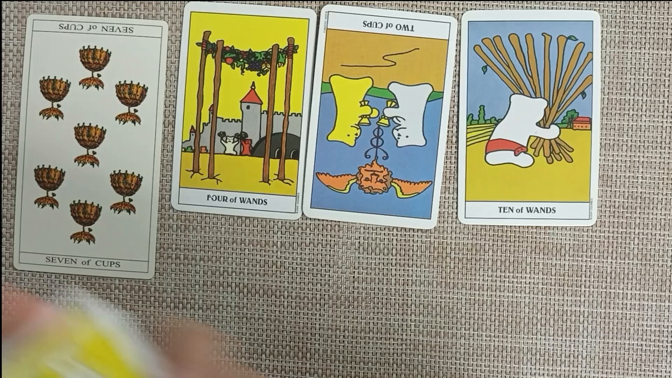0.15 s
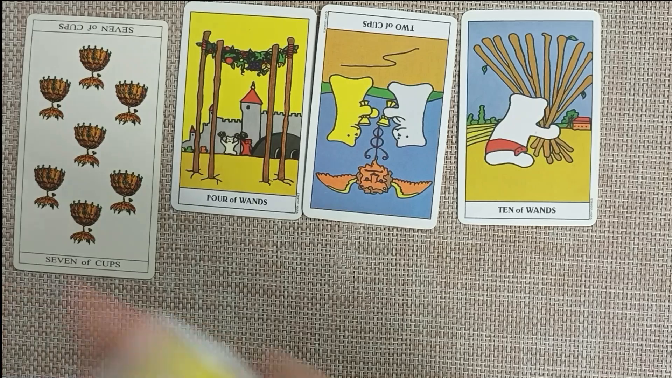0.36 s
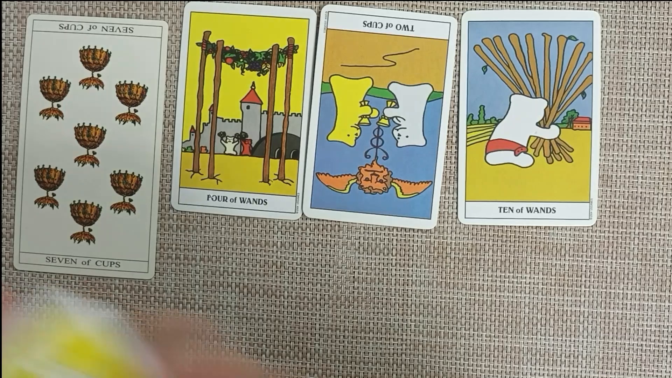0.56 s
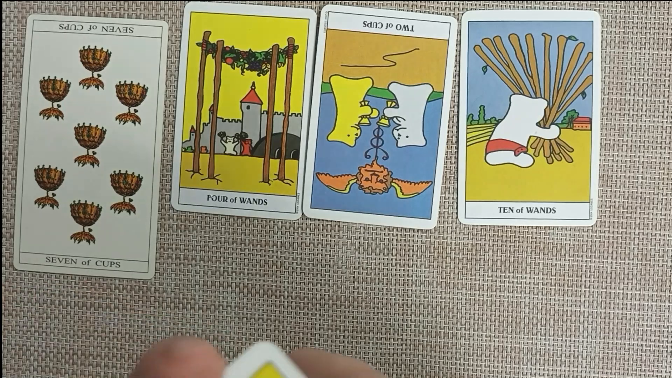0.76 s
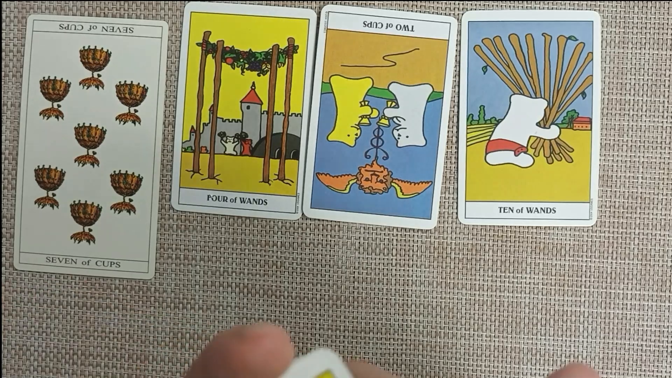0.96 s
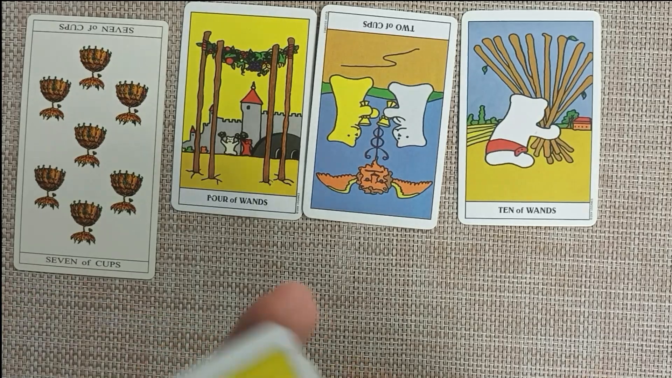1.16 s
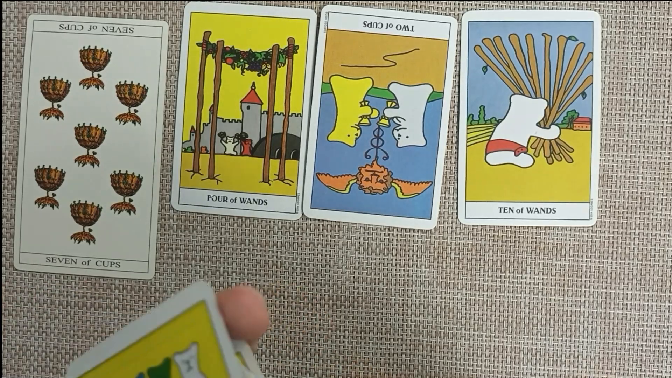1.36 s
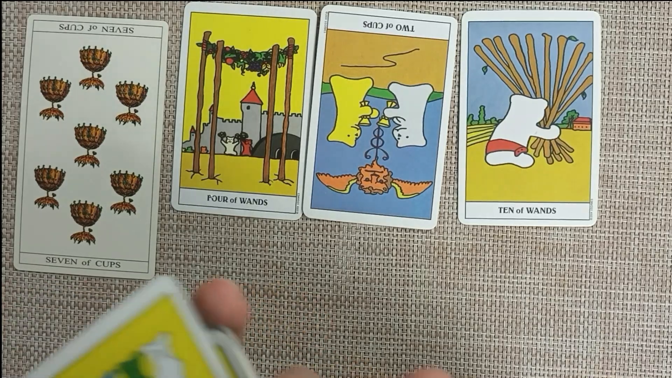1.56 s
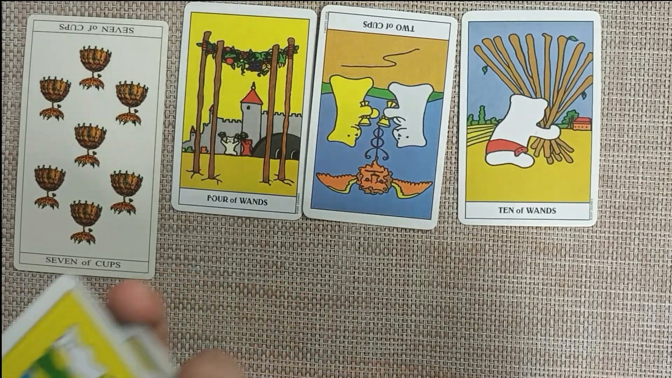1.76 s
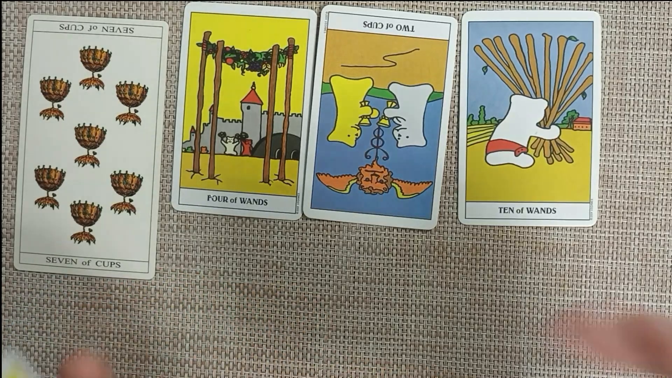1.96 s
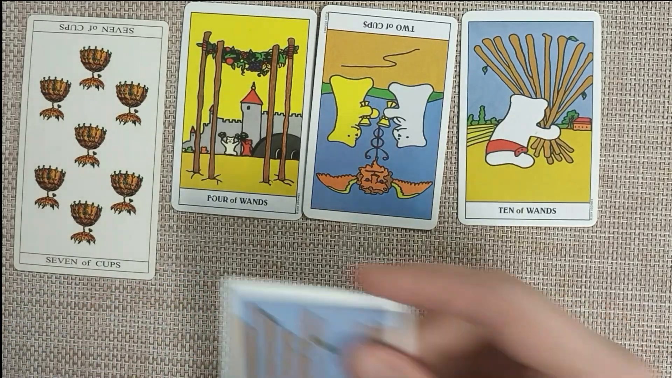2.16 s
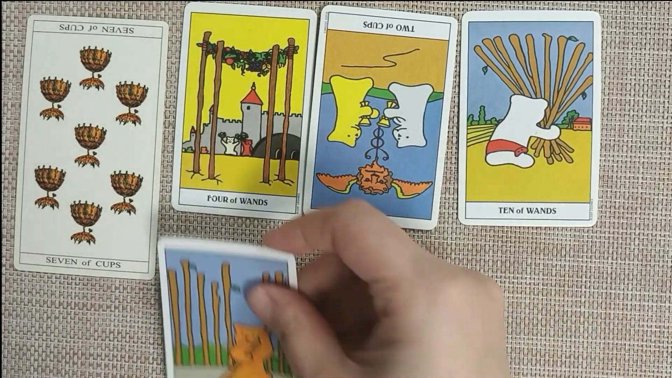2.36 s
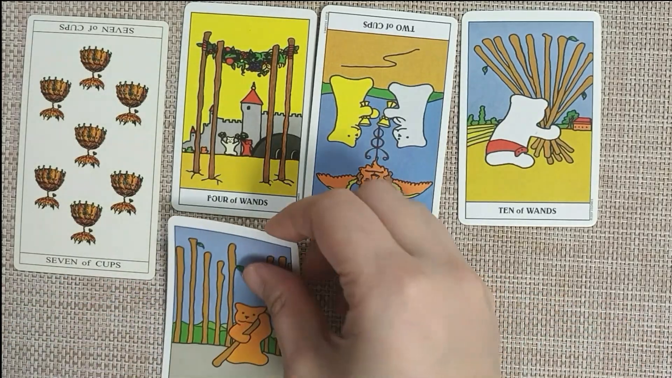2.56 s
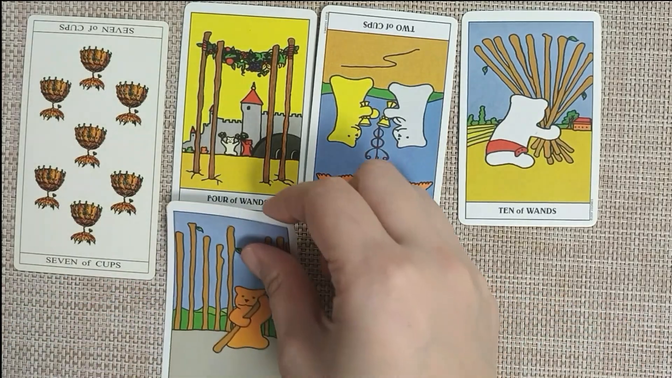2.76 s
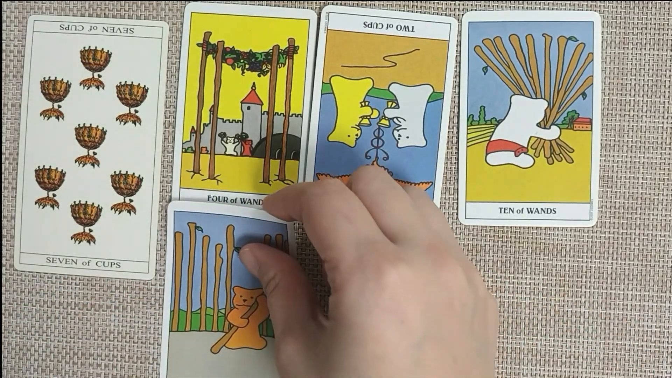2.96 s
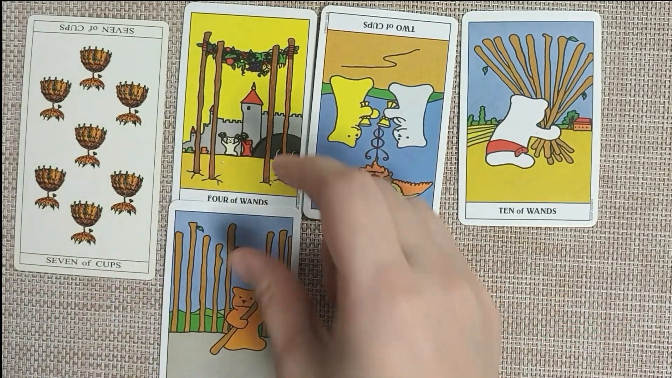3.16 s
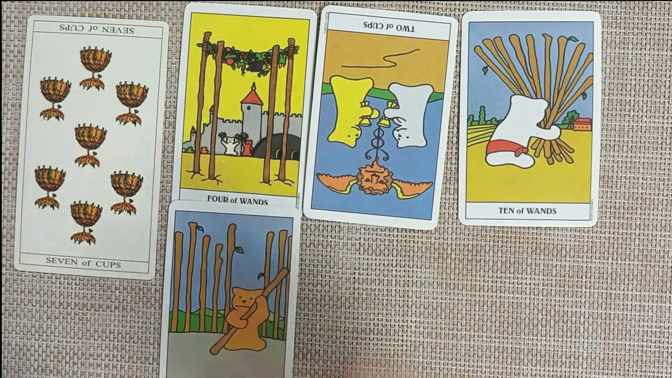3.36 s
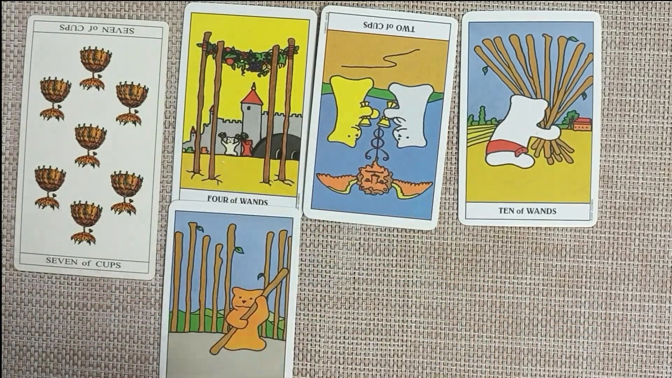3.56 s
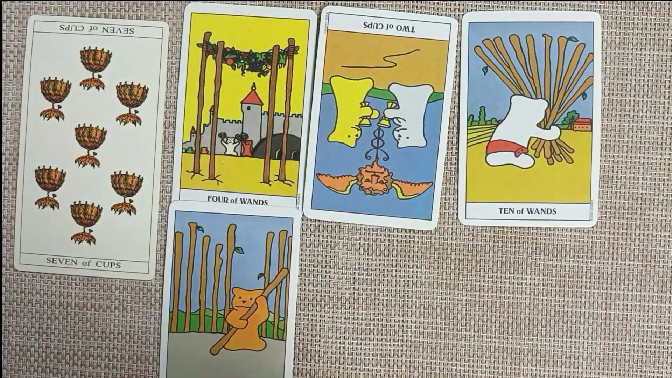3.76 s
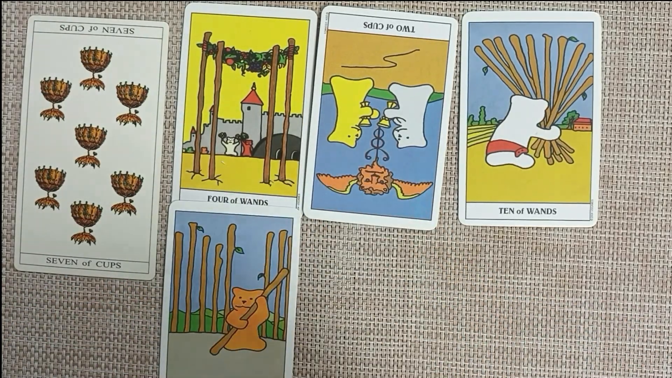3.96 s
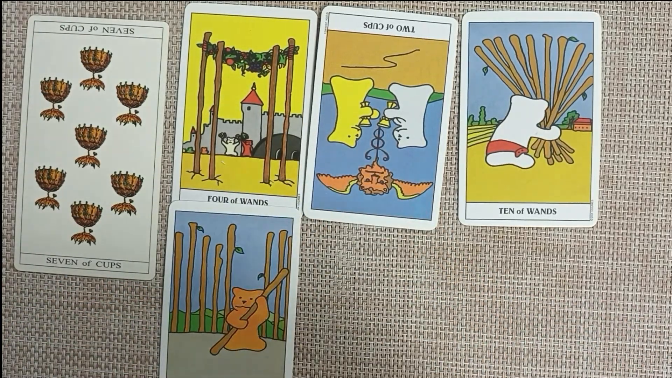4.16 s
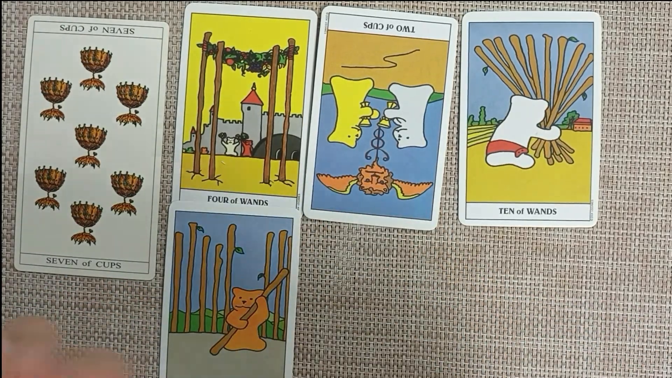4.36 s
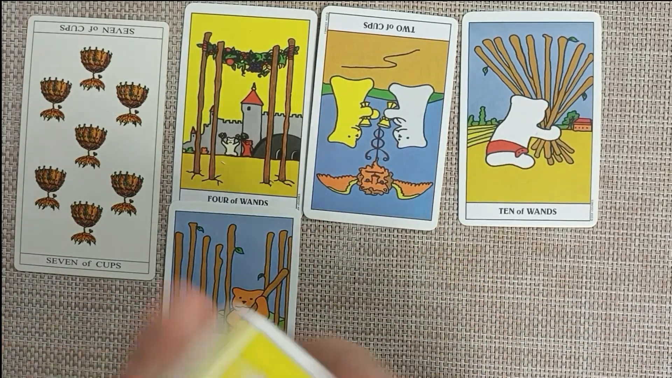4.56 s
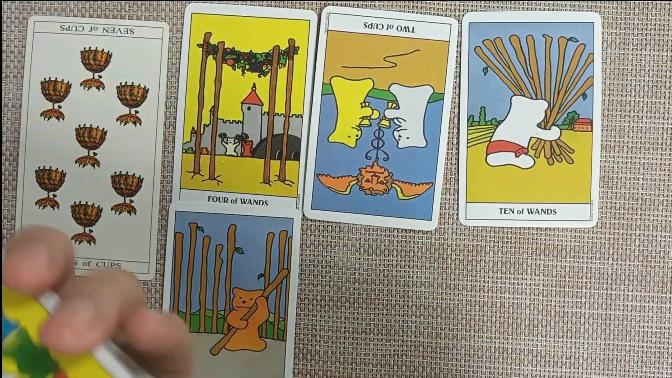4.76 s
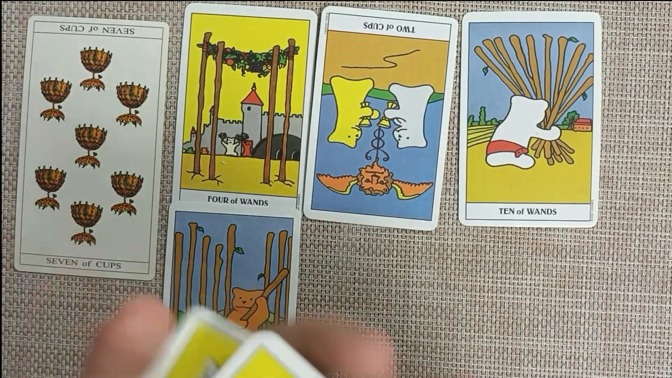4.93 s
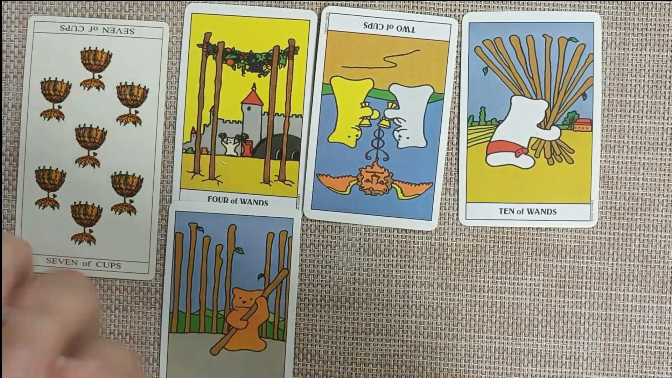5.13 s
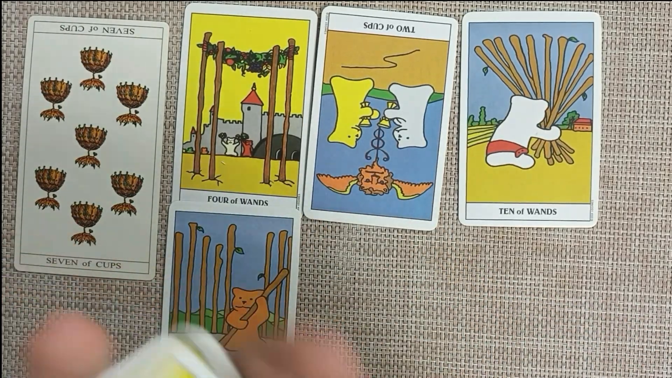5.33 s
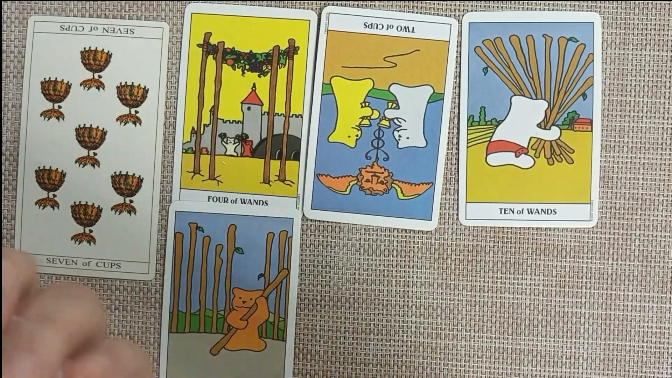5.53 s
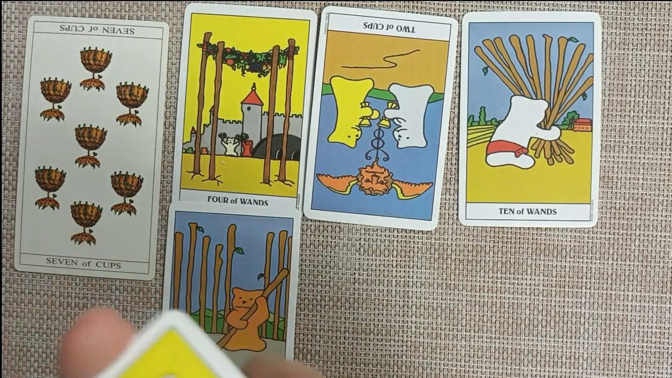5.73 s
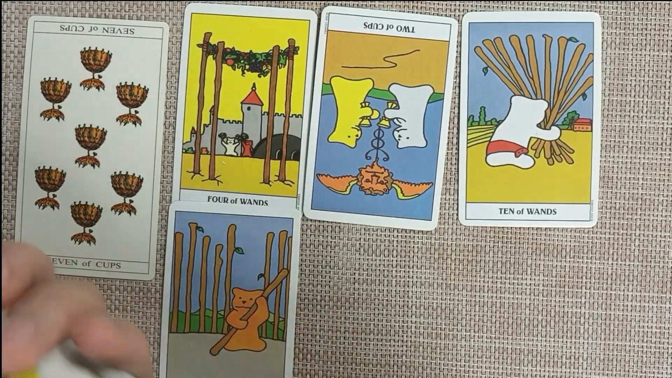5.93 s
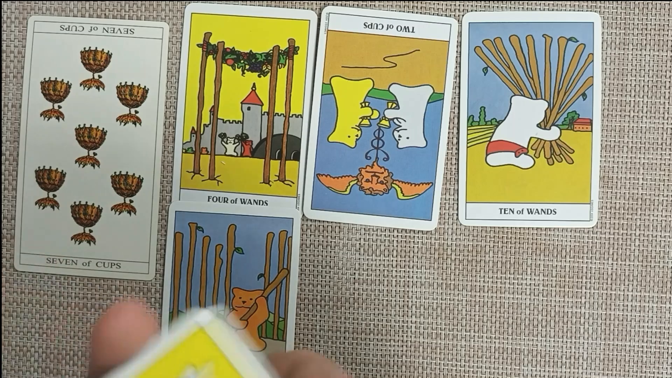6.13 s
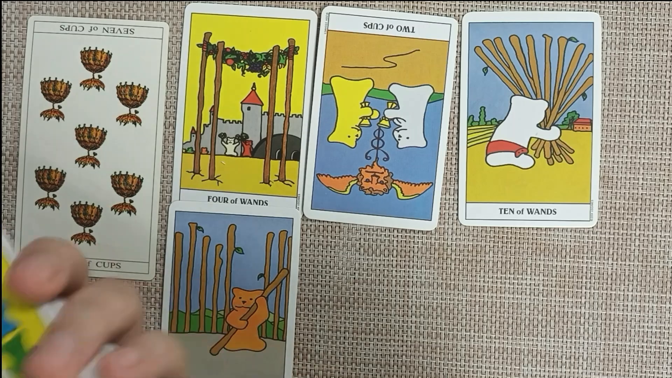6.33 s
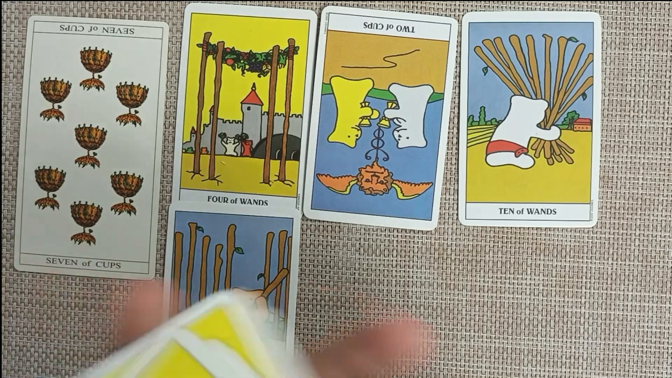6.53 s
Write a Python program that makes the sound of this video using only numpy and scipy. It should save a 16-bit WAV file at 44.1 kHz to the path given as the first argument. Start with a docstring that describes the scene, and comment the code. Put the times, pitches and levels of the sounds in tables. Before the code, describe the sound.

Stiff cards are shuffled overhand close to the microphone, opening with about half a second of crisp slaps and hissing slides. The handling then turns quieter, with scattered ticks and soft rubbing, a longer slide around 1.4 seconds and a couple of clicks near 1.6 and 1.8 seconds. Faint rustling fades until 2.8 seconds, when one card snaps sharply onto a cloth-covered table. A few gentle slides follow between 3.1 and 3.7 seconds. At 4 seconds the shuffling resumes, brisk and louder: packets slap the palm, faces swish and edges click in uneven bursts, two or three each second, with short pauses between them. The last bright cluster comes at about 6.5 seconds. The sound is dry and near, and the room is quiet, with a faint hiss and a distant low rumble throughout.

```python
"""Slaps, hissing slides and ticks of stiff cards shuffled overhand; one card snaps onto a cloth-covered table.
Packets strike the palm, faces rub and edges catch, driving the modes of the deck.
Distant rumble fills the quiet room. A two-port microphone sits close by;
the recorder ducks after loud slaps and clips the sharpest ones."""
import sys
import numpy as np
from scipy import signal
from scipy.fft import rfft, irfft
from scipy.io import wavfile
from scipy.ndimage import uniform_filter1d

SR = 44100
rng = np.random.default_rng(int(sys.argv[2]) if len(sys.argv) > 2 else 0)


def dump(signal):
    """Clip the signal to [-1, 1] and save it as 16-bit WAV at the path in sys.argv[1]."""
    limited = np.clip(np.atleast_2d(signal).T, -1, 1)
    pcm = np.round(limited * 32767).astype(np.int16)
    wavfile.write(sys.argv[1], SR, pcm)


N = 295029

# Room hiss spectrum: freq_hz, relative_db
AIR_SPECTRUM = [(150, -7), (250, -5.5), (557, -14), (845, -7), (1040, -12.5), (1330, -7.5), (3580, -21.5),
                (5350, -31.5), (8400, -43), (10700, -27), (16000, -29)]
# Room tone likeness between ports: freq_hz, coherence
ROOM_COHERENCE = [(60, 0.94), (300, 0.71), (900, 0.4), (3000, 0.034)]
# Distant rumble spectrum: freq_hz, relative_db
RUMBLE_SPECTRUM = [(29, -21), (50, -3), (85, 0.5), (124, -6), (160, 1.5), (184, -6), (247, -7.5),
                   (306, -16.5), (500, -23.5), (650, -27.5), (1100, -120)]
# Background swell: time_s, rumble_db, low_tone_db
RUMBLE_LEVELS = [(0.0, -69, -54), (0.2, -43, -52), (0.59, -57, -64), (0.69, -48, -57), (1.19, -45.5, -56),
                 (1.68, -43, -42), (1.96, -41, -49), (2.48, -43.5, -49.5), (2.603, -48, -51),
                 (2.81, -46, -47), (3.74, -50.5, -61), (4.021, -49, -53), (4.57, -43, -55),
                 (4.836, -45.5, -55), (5.349, -51.5, -42.5), (5.5, -43.5, -45.5), (6.2, -44, -41),
                 (6.69, -48, -47)]
# Wall reflection decay: freq_hz, t60_s
WALL_DECAY = [(300, 0.18), (2000, 0.23), (8000, 0.2), (15000, 0.13)]
# Response of the left port, facing away from the hands: freq_hz, gain_db
LEFT_PORT_EQ = [(2000, 0.5), (8000, 2), (14000, -4)]
# Held deck: freq_hz, width_hz, relative_db
DECK_MODES = [(1735, 59, -6), (2170, 190, 4), (3070, 1270, 13), (3760, 1500, 9.5), (5330, 2340, 20)]
# Deck against palm or table: freq_hz, width_hz, relative_db
THUMP_MODES = [(264, 450, 0), (427, 640, -3), (700, 240, -3), (940, 130, -6), (1490, 250, -4)]
# Rubbing spectrum, with the port's peak: freq_hz, relative_db
HISS_SPECTRUM = [(2350, -47.5), (4000, -21.5), (5820, -14), (7940, -11.5), (8770, -9.5), (10300, 1.5),
                 (12200, -7), (15100, -14.5), (16200, -23.5)]
# Fingers on the cards between strokes: time_s, hiss_db, scrape_re_hiss_db
FINGER_RUSTLE = [(0, -58, 7), (.55, -76, 19), (1.199, -60.5, -6), (1.75, -63, -14), (2.3, -62, 4.5),
                 (2.7, -52.5, -5), (3.0, -55.5, -1), (3.8, -53.5, -7.5), (4.15, -49.5, -2),
                 (4.6, -47.5, 1.5), (4.98, -50, -3.5), (5.45, -61, -5), (5.8, -53.5, 2), (6.2, -57, 4),
                 (6.69, -58, 4)]
# Faces sliding: peak_s, hiss_db, swell_s_per_20db, fade_s_per_20db, scrape_re_hiss_db, left_re_right_db
SLIDE_STROKES = [(0.01, -22, 0.082, 0.07, -10.5, -3), (0.128, -18.5, 0.071, 0.082, -41, -4.5),
                 (0.179, -20.5, 0.05, 0.044, -7, -1), (0.295, -27, 0.011, 0.027, -7, 3),
                 (0.374, -23, 0.029, 0.082, -12, -3), (0.681, -41, 0.074, 0.036, -2, -5),
                 (0.765, -36, .005, 0.034, -13, 4), (0.85, -38, 0.11, 0.44, -18, -2),
                 (1.0, -45, 0.49, 0.13, -3.5, -3), (1.285, -38, 0.047, 0.52, -3, -1),
                 (1.375, -29.5, 0.11, 0.11, -10.5, -1), (1.4, -28.5, 0.064, 0.074, -8, -7),
                 (1.428, -30.5, .08, 0.03, -9, -7), (1.5, -47, 0.05, 0.061, 6, 0),
                 (1.53, -41, 0.12, 0.014, 6, -3.5), (1.6, -32, 0.17, 0.015, -11, -5.5),
                 (1.63, -40, .005, 0.11, -13, 0), (1.772, -33, 0.003, 0.047, -12, -4),
                 (1.909, -37.5, 0.23, 0.64, -2.5, 0), (2.078, -45, .005, 0.33, 1, -2),
                 (2.19, -45, 0.14, 0.054, 5, 2), (2.814, -34.5, 0.0054, 0.14, -27, 1),
                 (3.131, -35, 0.067, 0.054, -5, -3), (3.351, -34, 0.097, 0.26, -10, 1),
                 (3.52, -48, 0.2, 0.059, -9, -1), (3.648, -32.5, 0.054, 0.1, -13, -2.5),
                 (3.975, -22, 0.12, 0.064, -20, -2.5), (4.001, -14, 0.014, 0.052, -16.5, 0),
                 (4.228, -29.5, 0.0069, 0.031, -16, -1), (4.262, -22, 0.019, 0.059, -3, -8),
                 (4.35, -25.5, 0.079, 0.12, -15, -2.5), (4.395, -26.5, 0.018, 0.023, -6, -3),
                 (4.411, -2.5, 0.025, 0.039, -36, -2), (4.655, -28.5, 0.0052, 0.16, 0, -6),
                 (4.764, -15.5, 0.019, 0.036, -12.5, -2), (4.847, -15.5, 0.11, 0.034, -21, -1),
                 (5.048, -38, 0.0047, 0.057, 0, 0), (5.103, -22.5, 0.011, 0.069, -10.5, 5),
                 (5.17, -29, .06, 0.043, -12, 0), (5.215, -25, 0.069, .05, -40, 1),
                 (5.239, -19, 0.065, 0.055, -36, -6.5), (5.36, -38.5, 0.28, 0.16, -4.5, 2),
                 (5.477, -14, 0.0048, 0.058, -8, -2.5), (5.55, -24.5, 0.049, 0.06, -11, -5),
                 (5.587, -11.5, 0.03, 0.05, -24.5, -2.5), (5.613, -8, 0.013, 0.043, -23, 4),
                 (5.624, -1, 0.02, 0.014, -32, -9), (5.659, -32, 0.034, 0.12, -14, 2),
                 (5.862, -15, 0.0098, 0.044, -9, 2), (5.885, -27.5, 0.025, 0.027, -2.5, 5),
                 (5.93, -29, 0.018, 0.15, -14, -8), (5.98, -30.5, 0.061, 0.027, -5.5, -9),
                 (6.02, -19.5, 0.15, 0.058, -23, 2), (6.043, -19.5, 0.092, 0.021, -37, -5),
                 (6.165, -43, 0.018, 0.044, -7, -2), (6.295, -24.5, 0.0079, 0.085, -5.5, -6),
                 (6.42, -31, 0.15, 0.18, -13.5, -3), (6.455, -22, 0.082, 0.06, -24, 2),
                 (6.483, -11, 0.0065, 0.064, -19.5, 2), (6.501, -10.5, 0.078, 0.0089, -32, -9),
                 (6.56, -42.5, 0.051, 0.21, -3, 1)]
# Faster rubbing scrapes higher: hiss_db, pitch_hz
SCRAPE_PITCH_CURVE = [(-52.5, 1800), (-41, 3400), (-38, 4400), (-16.5, 4300), (-9, 7400)]
# Dealt card: freq_hz, level_db
FLICK_MODES = [(430, -11), (950, -13), (3100, -25), (4030, -3), (5000, -12), (6050, -3), (7300, 0)]
# Impact spectrum: freq_hz, relative_db
SNAP_SPECTRUM = [(2350, -30.5), (4000, -18), (4660, -13.5), (6850, -5.5), (7440, -5), (8030, -7.5),
                 (10200, 8), (15200, -12), (16200, -6.5)]
# Edges and packets striking: time_s, snap_db, t60_s, left_re_right_db, ring_re_snap_db, ring_hz,
# thump_re_snap_db, knock_re_snap_db, knock_hz
IMPACTS = [(0.0014, -8, 0.024, -2.5, -0.5, 3770, -10, -4.5, 1327),
           (0.161, -20.5, 0.038, -3, -6, 2000, -2.5, -1, 910),
           (0.1653, -18, 0.026, -5, 0, 2540, -3, 2, 300),
           (0.181, -10.5, 0.04, -3, -37.0, 4680.0, -33, -22, 410),
           (0.2904, -15.5, 0.026, -4, -6.5, 2330, -11, -18, 300),
           (0.297, -29.5, 0.022, -7, -17.0, 2230.0, -7, 14, 687),
           (0.3316, -2, 0.0059, -6, -0.5, 3270, -40, -11, 1250),
           (0.357, -28, 0.03, -11, -1, 1480, -7, -10, 300),
           (0.3619, -18, 0.032, -4.5, 0, 1690, -3.5, 0, 710),
           (0.373, -21, 0.026, -1, -3, 3850, -15.5, -13, 1030),
           (0.439, -40.5, 0.017, -8, -4, 1800, -2, 1, 750),
           (0.677, -28.5, 0.027, -1, -2, 3870, -27, -7, 550),
           (0.689, -35.5, 0.015, -4.5, -3, 3020, -1, -13, 700),
           (0.7593, -25.5, 0.024, -5, -1.5, 1720, -12, -15, 646),
           (0.8346, -31.5, 0.033, 0, -9, 2960, -22, -17, 180),
           (1.12, -37, 0.012, -2, -2, 1440, -21, -19, 200),
           (1.408, -41.5, 0.028, -7, -3.0, 2060, -3.0, 8, 645),
           (1.6161, -12, 0.013, -2, -17, 2840, -13.5, -23, 910),
           (1.6213, -25, 0.079, -3, -28, 1490.0, -8, -4, 317),
           (1.766, -18.5, 0.022, -7, -28, 5100.0, -20.5, -15, 195),
           (2.067, -35, 0.017, -2, 10, 2560, -6, -3, 1060), (2.1684, -37, 0.03, 4, 1.5, 2800, -25, -9, 170),
           (2.19, -37, 0.03, 0, 3.5, 2100, -20, -20, 500), (2.213, -37, 0.03, 2, 0, 2880, -22, -20, 500),
           (2.795, -21, 0.056, -4, 3, 5050, -19, -15, 328),
           (2.801, 2.5, 0.0098, 6, -11, 5660, -32, -13.5, 280),
           (2.8039, -1.5, 0.0082, 2.5, -7, 3200, -31, -20, 282),
           (3.1019, -27, 0.009, 5, -5.5, 2070, -16, -23, 980),
           (3.9898, -6, 0.022, -4, -20, 2110, -46.0, -46, 240),
           (3.9997, -5, 0.018, -10, -13, 2100, -54, -36, 170),
           (4.008, -6, 0.029, -8, -33, 4220.0, -55, -48, 990),
           (4.024, -26, 0.01, -5, -3, 2130, -2, -8, 780), (4.2447, -16, 0.034, -9, 0, 4200, -2.5, -7, 405),
           (4.2557, -15, 0.014, 5, -6, 2960, -30, 1, 950), (4.254, -11.5, 0.018, 2, -6, 1080, -14, -7, 340),
           (4.269, -16, 0.029, -1, -6.5, 3760, -37, -28, 168),
           (4.2915, -25, 0.027, -4, 7.5, 3730, -8, -2, 940),
           (4.2965, -29, 0.032, 3, 10.5, 3130, -25, -20, 930),
           (4.408, -7, 0.019, -4, -39, 4670, -40, -23, 172),
           (4.4134, -7.5, 0.024, -12, -40, 4730, -53.0, -40, 1264),
           (4.431, -6.5, 0.015, 4, -36.0, 3800.0, -44, -50, 170),
           (4.4416, -8.5, 0.024, -1.5, 0, 2250, -22, -11.5, 220),
           (4.6479, -4.5, 0.0076, -2.5, -3, 2010, -22, -11, 470),
           (4.6495, 2, 0.01, -7, -10, 3400, -25, -20, 606),
           (4.654, -19, 0.0067, 1, -10, 3000, -26, -25, 475),
           (4.661, -17, 0.015, -3, -1, 3520, -8, -15, 400),
           (4.6732, -11.5, 0.016, -3, 3, 3900, -6, -2, 167),
           (4.6817, -16, 0.011, -1, 2, 4430, -12, -13, 600),
           (4.7046, -18.5, 0.018, -1, 1.5, 4200, -41.0, -27, 560),
           (4.74, -29, 0.03, 1, -1, 3980, -30, -35, 500),
           (4.759, -10.5, 0.043, 0, -19, 4710.0, -49.0, -33, 1010),
           (4.8318, -3.5, 0.0084, -12.5, -21, 4800.0, -45, -39, 280),
           (4.8431, -1.5, 0.023, -4, -23, 4720.0, -49, -50, 400),
           (4.847, -7.5, 0.015, -14, -24, 5000, -51.0, -50, 1040),
           (5.058, -32, 0.028, 1, 2, 2340, -18, -30, 500),
           (5.0936, -9, 0.017, -5.5, -5, 3260, -12, -29, 270),
           (5.1023, -2, 0.0088, -1.5, -4.5, 3150, -16, -13, 201),
           (5.115, -15.5, 0.033, -7, -23.0, 4300, -42.0, -35, 1130),
           (5.152, -26, 0.039, -2, -2, 3400, -33, -40, 500),
           (5.222, -17, 0.0071, -4, -33, 4500, -40, -40, 660),
           (5.2316, -11, 0.0071, -7, -30.0, 4520.0, -24, -39, 660),
           (5.2401, -7, 0.01, -7, -20, 4570, -41.5, -33, 1290),
           (5.2579, -15, 0.022, 3, -16, 2000, -20.5, -28, 744),
           (5.364, -23, 0.027, -4.5, 2, 2240, -29, -1.5, 180),
           (5.473, -10.5, 0.017, -3, -7, 3600, -28, -24, 860),
           (5.477, -6.5, 0.011, -3, -12, 6300, -16, -16, 835),
           (5.4829, -16.5, 0.015, -3, -12, 1020, -7, -3, 170),
           (5.4916, -8.5, 0.031, 1, -11, 4900, -43.0, -12, 170),
           (5.505, -16.5, 0.053, 2, -23, 3440, -38, -35, 820),
           (5.548, -19, 0.069, 2, -4.5, 3250, -43.0, -32, 690),
           (5.586, -10, 0.039, -2, -34, 4840.0, -50.0, -45, 400),
           (5.6208, -9, 0.033, -11, -45, 3900, -54, -46, 180),
           (5.64, -17.5, 0.015, 0, -9, 2940, -5, -9, 170),
           (5.8523, -9.5, 0.017, -2.5, 0.5, 2135, -3, -13, 310),
           (5.8568, -5.5, 0.013, -4, -4.5, 990, -17, -24, 202),
           (5.873, -11.5, 0.068, -2, -2, 3640, -42, -27, 640),
           (5.979, -33.5, 0.014, 0, -2, 2200, -30, -30, 500),
           (6.044, -15, 0.005, -9, -32.0, 4150, -64, -18, 366),
           (6.0612, -11.5, 0.01, -4, -11.5, 2650, -27, -26, 546),
           (6.291, -6.5, 0.017, -3, 1, 2580, -16, -23, 580),
           (6.303, -17, 0.032, -8, -18, 3780.0, -37, -25, 170),
           (6.313, -21, 0.063, 2, -4, 4040, -42.5, -33, 330),
           (6.445, -16, 0.024, -4, -25.0, 4500.0, -48.5, -20, 170),
           (6.4813, -2.5, 0.014, -6.5, -14, 2030, -19.5, -15, 815),
           (6.4874, -5, 0.0093, -12, -28, 3000.0, -45, -46, 930),
           (6.493, -4, 0.0088, -2, -30, 4500.0, -43.0, -45, 730),
           (6.504, -7.0, 0.0062, -9, -27, 4500.0, -48.0, -50, 1120),
           (6.515, -26.5, 0.019, -5, 0, 2280, -2, -14, 400),
           (6.65, -38.5, 0.013, -2, -6, 2000, -23.0, -50, 170)]

AIR_DB, BASS_LAG_S = -47.5, 0.0006
HUM_HZ, HUM_WIDTH_HZ, HUM_DB = 157.1, 18, -58.5
LOW_TONE_HZ, LOW_TONE_WIDTH_HZ = 42.9, 20
WALLS_DB, LEFT_LAG_SAMPLES = -20.0, 44
HISS_PATCH_DB, SCRAPE_PATCH_DB = 4, 4.5
SCRAPE_SLOPE_RATIO = 0.96  # re hiss, in swell and fade
GRIT_PER_S, GRIT_SPREAD_DB, GRIT_DECAY_S = 250, 7, 0.0036
FLICK_S, FLICK_PAN_DB, FLICK_RISE_S, FLICK_T60_S = 2.8028, 8.5, 0.00078, 0.009
MAX_RISE_S, RISE_PER_T60 = 0.00245, 0.1244
RING_BOOST_DB, LIGHT_TAP_DB, BLUR_DB_PER_DB = 7, -32, 0.48  # hits above a light tap ring less clearly
HAND_T60_S, RING_T60_CYCLES = 0.3, 150  # extra damping of the tones by hand and card
KNOCK_SAG_RATIO, KNOCK_SAG_S = 0.13, 0.025  # pitch sinks as the palm yields
CLICK_RE_SNAP_DB, CLICK_T60_LIMIT_S = 3, 0.025  # longer hits click less
DUCK_THRESHOLD_DB, DUCK_DB_PER_DB, DUCK_SMOOTH_S, HOLD_DECAY_DB_PER_S = -21.5, 0.44, 0.024, 28.0
BAND_LIMIT_HZ = 16000


def gain_of(db):
    return 10 ** (np.asarray(db) / 20)


def unit_rms(x):
    return x / np.sqrt(np.mean(x ** 2) + 1e-20)


def curve_at(points, hz):
    freq_hz, value = np.transpose(points)
    return np.interp(np.log(hz + 1), np.log(freq_hz + 1), value)


def pan_gains(left_re_right_db):
    return gain_of([[left_re_right_db / 2], [-left_re_right_db / 2]])


def port_noise(coherence):
    shared, own = rng.standard_normal((2, N))
    return np.array([coherence * shared + np.sqrt(1 - coherence ** 2) * own, shared])


def spectrum_taps(points):
    """Minimum-phase filter, unit energy."""
    log_gain = np.log(gain_of(curve_at(points, abs(np.fft.fftfreq(4096, 1 / SR)))))
    taps = np.fft.ifft(np.exp(np.conj(signal.hilbert(log_gain)))).real[:1024]
    return taps[None] / np.linalg.norm(taps)


def mode_taps(modes):
    """Sum of damped sines, unit energy."""
    t = np.arange(1500) / SR
    taps = sum(gain_of(db) * np.sqrt(width_hz) * np.exp(-np.pi * width_hz * t)
               * np.sin(2 * np.pi * hz * t) for hz, width_hz, db in modes)
    return taps[None] / np.linalg.norm(taps)


def convolve(x, taps):
    return signal.oaconvolve(x, taps, axes=1)[:, :N]


def swept_resonance(x, hz, width_hz):
    """Band-pass that follows hz; white noise keeps its power."""
    carrier = np.exp(2j * np.pi * np.cumsum(hz) / SR)
    pole = np.exp(-np.pi * width_hz / SR)
    return np.sqrt(2 * (1 - pole * pole)) * (carrier * signal.lfilter([1], [1, -pole], x / carrier)).real


def room_tone():
    """Steady hiss, swelling distant rumble, two fuzzy low tones; bass reaches the right port first."""
    t, hz = np.arange(N) / SR, np.fft.rfftfreq(N, 1 / SR)
    shared, own = rfft(rng.standard_normal((2, N)))
    coherence = curve_at(ROOM_COHERENCE, hz)
    delay = np.exp(-2j * np.pi * hz * BASS_LAG_S)
    noise = np.array([coherence * delay * shared + np.sqrt(1 - coherence ** 2) * own, shared])
    time_s, rumble_db, low_tone_db = np.transpose(RUMBLE_LEVELS)
    hum_band = 1 / (1 + (2 * (hz - HUM_HZ) / HUM_WIDTH_HZ) ** 2)
    low_band = 1 / (1 + (2 * (hz - LOW_TONE_HZ) / LOW_TONE_WIDTH_HZ) ** 4)
    layers = [(AIR_DB, gain_of(curve_at(AIR_SPECTRUM, hz))),
              (np.interp(t, time_s, rumble_db), gain_of(curve_at(RUMBLE_SPECTRUM, hz))),
              (HUM_DB, hum_band),
              (np.interp(t, time_s, low_tone_db), low_band)]
    return sum(gain_of(db) * unit_rms(irfft(noise * colour, N)) for db, colour in layers)


def walls(x):
    """Sparse reflections from 14 ms on; each band dies at its own rate."""
    taps = np.zeros((2, 16000))
    arrivals = np.arange(600, 15980, 20) + rng.integers(0, 20, (2, 769))
    np.put_along_axis(taps, arrivals, rng.choice([-1., 1.], arrivals.shape), 1)
    hz, t, bands = signal.stft(taps, SR, nperseg=256)
    decay = gain_of(-60 * t / curve_at(WALL_DECAY, hz)[:, None])
    tail = signal.istft(bands * decay, SR, nperseg=256)[1]
    return convolve(x, tail / np.linalg.norm(tail[0]))


def port_shading(x):
    """The left port faces away: it hears the cards later, with less top treble."""
    eq = gain_of(curve_at(LEFT_PORT_EQ, np.fft.rfftfreq(N, 1 / SR)))
    left = irfft(rfft(x[0]) * eq, N)
    return np.array([np.r_[np.zeros(LEFT_LAG_SAMPLES), left[:-LEFT_LAG_SAMPLES]], x[1]])


def radiated(x, cutoff_hz):
    """A small deck radiates little bass."""
    return signal.sosfilt(signal.butter(2, cutoff_hz, "high", fs=SR, output="sos"), x)


def stick_slip(span_samples, depth_db):
    """Random gain of card sticking and slipping on card."""
    drift = uniform_filter1d(uniform_filter1d(rng.standard_normal(N), span_samples), span_samples)
    return gain_of(depth_db * unit_rms(drift))


def grit():
    """Gain jumps briefly whenever an edge catches."""
    sizes = gain_of(GRIT_SPREAD_DB * np.minimum(rng.exponential(1, N), 3))
    catches = sizes * (rng.random(N) < GRIT_PER_S / SR)
    return 1 + signal.lfilter([1], [1, -np.exp(-1 / (GRIT_DECAY_S * SR))], catches)


def rubbing_noise(coherence, depth_db):
    """Colour drifts in patches as faces and hands shift."""
    bands = signal.stft(port_noise(coherence), nperseg=256)[2]
    patches = uniform_filter1d(rng.standard_normal(bands.shape), size=3, axis=1)
    patches = unit_rms(uniform_filter1d(patches, size=14, axis=2))
    return unit_rms(signal.istft(bands * gain_of(depth_db * patches), nperseg=256)[1][:, :N])


def sliding():
    """Strokes swell and fade over the finger rustle: hiss and scrape envelopes, scrape pitch."""
    t = np.arange(N) / SR
    time_s, rustle_db, rustle_scrape_db = np.transpose(FINGER_RUSTLE)
    hiss_power = gain_of(np.interp(t, time_s, rustle_db)) ** 2 * np.ones((2, 1))
    scrape_power = hiss_power * gain_of(np.interp(t, time_s, rustle_scrape_db)) ** 2
    for peak_s, hiss_db, swell_s, fade_s, scrape_db, pan_db in SLIDE_STROKES:
        span = slice(max(round((peak_s - 0.6) * SR), 0), round((peak_s + 0.6) * SR))
        offset_s = t[span] - peak_s
        shape_db = -20 * np.maximum(-offset_s / swell_s, offset_s / max(fade_s, 0.01))
        peak = pan_gains(pan_db) * gain_of(hiss_db)
        hiss_power[:, span] += (peak * gain_of(shape_db)) ** 2
        scrape_power[:, span] += (peak * gain_of(scrape_db + SCRAPE_SLOPE_RATIO * shape_db)) ** 2
    scrape_hz = np.interp(10 * np.log10(hiss_power.mean(0)), *np.transpose(SCRAPE_PITCH_CURVE))
    slip = unit_rms(stick_slip(350, depth_db=0.71) * grit() ** 0.29)
    scrape_slip = slip * unit_rms(stick_slip(390, depth_db=0.98))
    return np.sqrt(hiss_power) * slip, np.sqrt(scrape_power) * scrape_slip, scrape_hz


def flick():
    """The dealt card's corner springs off the thumb and rings; the cloth stops it at once."""
    t, start = np.arange(2000) / SR, round(FLICK_S * SR)
    ring = sum(gain_of(db) * np.sin(2 * np.pi * hz * t) for hz, db in FLICK_MODES)
    envelope = gain_of(-60 * t / FLICK_T60_S) * np.minimum(t / FLICK_RISE_S, 1)
    out = np.zeros((2, N))
    out[:, start:start + len(t)] = pan_gains(FLICK_PAN_DB) * ring * envelope
    return out


def impact_tones(t, snap_db, ring_db, ring_hz, knock_db, knock_hz):
    """Ring of the packet and hollow knock of the palm, damped by the hand."""
    tone_db = ring_db + RING_BOOST_DB - BLUR_DB_PER_DB * max(snap_db - LIGHT_TAP_DB, 0)
    ring = gain_of(tone_db - 60 * ring_hz * t / RING_T60_CYCLES) * np.sin(2 * np.pi * ring_hz * t)
    sag = 1 - KNOCK_SAG_RATIO * np.tanh(t / KNOCK_SAG_S)
    knock = gain_of(knock_db) * np.sin(2 * np.pi * knock_hz * sag * t)
    return (ring + knock) * gain_of(-60 * t / HAND_T60_S)


def striking():
    """Hits rise fast, then decay: snap, ring and thump envelopes, tones, edge click, tap on the deck."""
    t = np.arange(4000) / SR
    tracks = np.zeros((6, 2, N + len(t)))
    for impact, sign in zip(IMPACTS, rng.choice([-1., 1.], len(IMPACTS))):
        time_s, snap_db, t60_s, pan_db, ring_db, ring_hz, thump_db, knock_db, knock_hz = impact
        rise_s = min(MAX_RISE_S, RISE_PER_T60 * t60_s)
        attack = np.sin(np.pi / 2 * np.minimum(t / rise_s, 1)) ** 2
        snap = attack * gain_of(snap_db - 60 * np.maximum(t - rise_s, 0) / t60_s)
        tones = sign * snap * impact_tones(t, snap_db, ring_db, ring_hz, knock_db, knock_hz)
        click_gain = gain_of(snap_db + CLICK_RE_SNAP_DB) * min(CLICK_T60_LIMIT_S / t60_s, 1)
        click = sign * click_gain * signal.unit_impulse(len(t), round(rise_s * SR))
        ring, thump, tap = gain_of(ring_db) * snap, gain_of(thump_db) * snap, gain_of(ring_db) * click
        layers = np.array([snap, ring, thump, tones, click, tap])
        start = max(round((time_s - rise_s / 2) * SR), 0)
        tracks[..., start:start + len(t)] += layers[:, None] * pan_gains(pan_db)
    return tracks[..., :N]


def cards():
    """Noisy contact forces drive each resonator; treble differs most between the ports."""
    hiss, scrape, scrape_hz = sliding()
    snap, ring, thump, tones, click, tap = striking() * unit_rms(stick_slip(20, depth_db=2.6))
    deck = mode_taps(DECK_MODES)
    out = convolve(hiss * rubbing_noise(0.041, HISS_PATCH_DB), spectrum_taps(HISS_SPECTRUM))
    out += convolve(snap * port_noise(0.053) + click, spectrum_taps(SNAP_SPECTRUM))
    out += convolve(1.126 * scrape * rubbing_noise(0.23, SCRAPE_PATCH_DB), deck)
    ring_force = 0.6 * ring * port_noise(0.15) + 0.23 * tap
    out += radiated(convolve(ring_force, deck), cutoff_hz=1350)
    out += swept_resonance(0.38 * scrape * port_noise(0.057), scrape_hz, width_hz=410)
    thump_force = (0.18 * scrape + 1.32 * thump) * port_noise(0.95)
    out += radiated(convolve(thump_force, mode_taps(THUMP_MODES)), cutoff_hz=168)
    return out + radiated(tones, cutoff_hz=113) + flick()


def scene():
    direct = port_shading(cards())
    return direct + gain_of(WALLS_DB) * walls(direct) + room_tone()


def record(dry):
    """Gain ducks after loud sounds and recovers slowly; then clipping and the band limit."""
    power_db = 10 * np.log10(abs(uniform_filter1d((dry ** 2).mean(0), 300)) + 1e-12)
    ramp_db = np.arange(N) * HOLD_DECAY_DB_PER_S / SR
    held_db = np.maximum.accumulate(power_db + ramp_db) - ramp_db
    over_db = np.maximum(held_db - DUCK_THRESHOLD_DB, 0)
    pole = np.exp(-1 / (DUCK_SMOOTH_S * SR))
    duck_db = DUCK_DB_PER_DB * signal.lfilter([1 - pole], [1, -pole], over_db)
    clipped = np.clip(dry / gain_of(duck_db), -1, 1)
    lowpass = signal.firwin(511, BAND_LIMIT_HZ, window=("kaiser", 9), fs=SR)
    return np.clip(signal.oaconvolve(clipped, lowpass[None], "same"), -1, 1)


dry = scene()
out = record(dry)
dump(out)
```